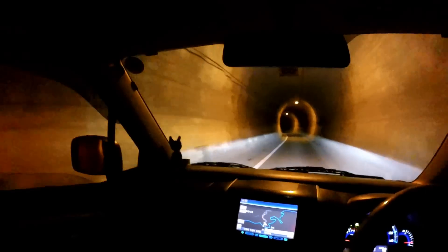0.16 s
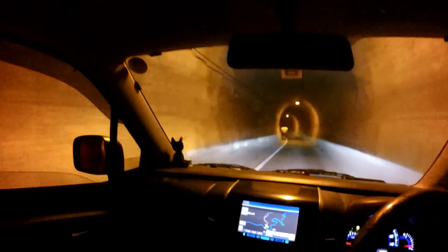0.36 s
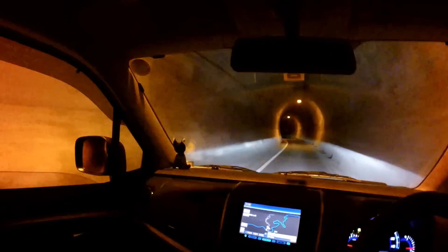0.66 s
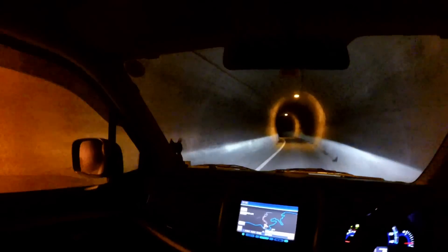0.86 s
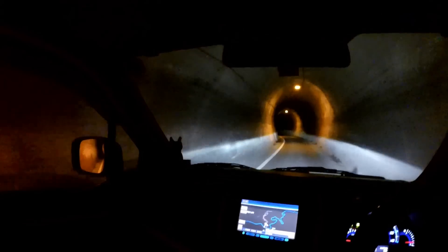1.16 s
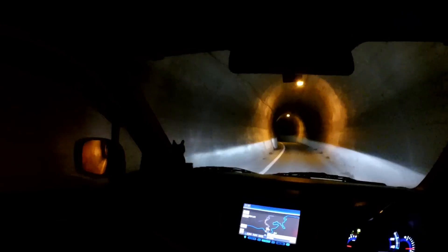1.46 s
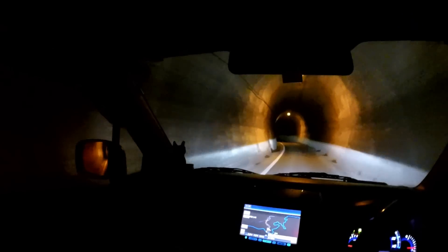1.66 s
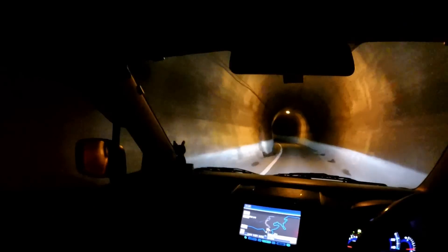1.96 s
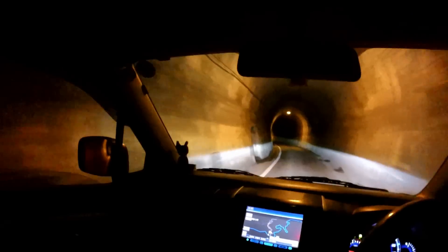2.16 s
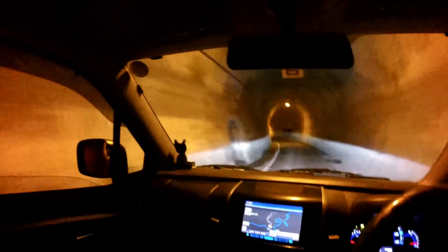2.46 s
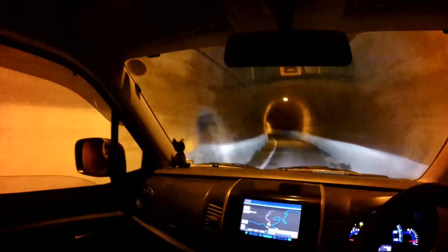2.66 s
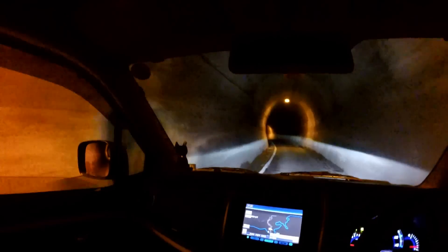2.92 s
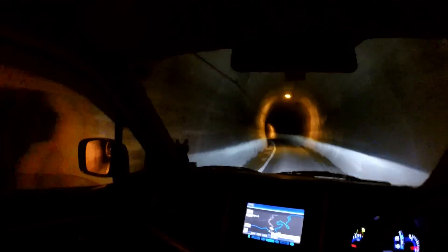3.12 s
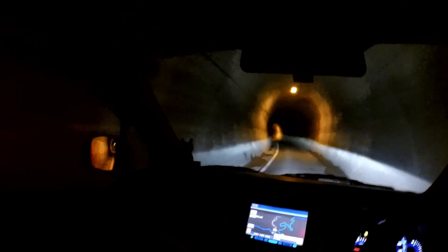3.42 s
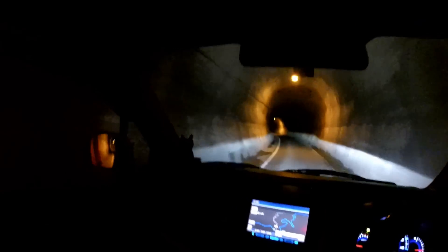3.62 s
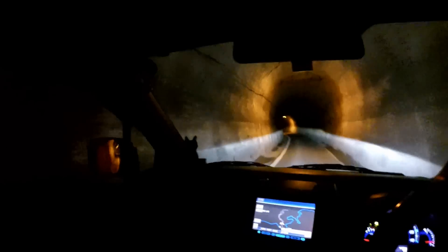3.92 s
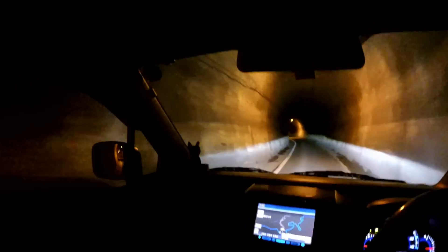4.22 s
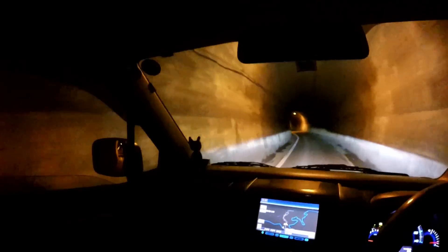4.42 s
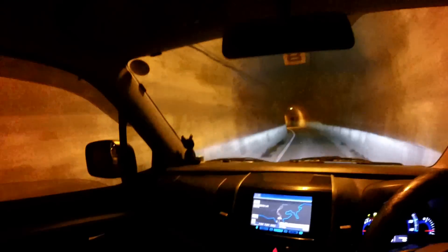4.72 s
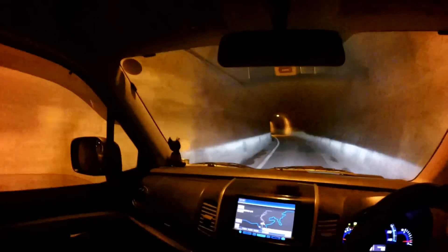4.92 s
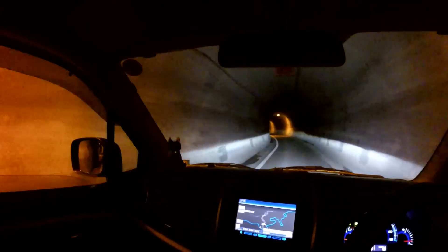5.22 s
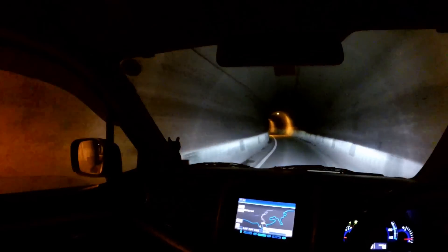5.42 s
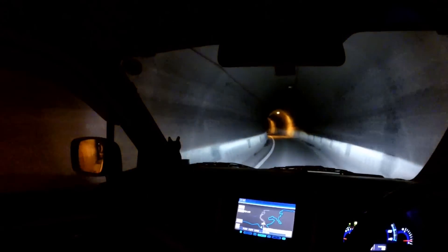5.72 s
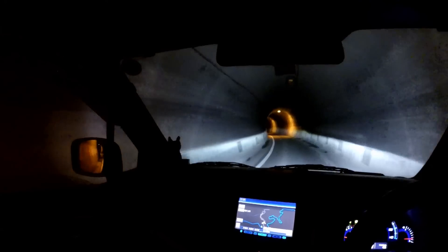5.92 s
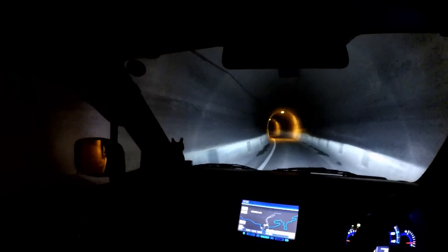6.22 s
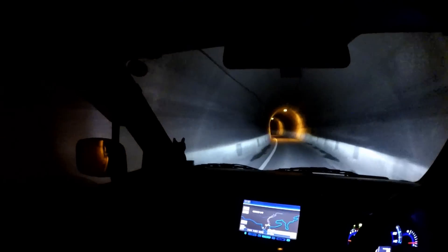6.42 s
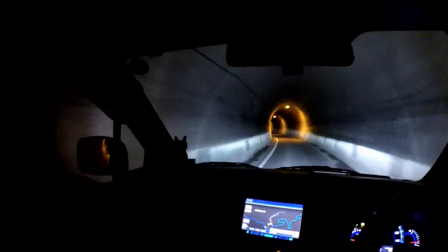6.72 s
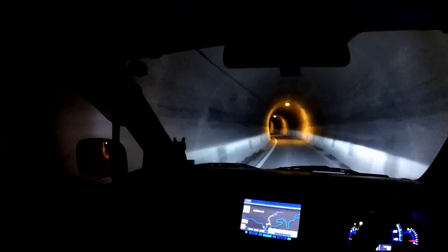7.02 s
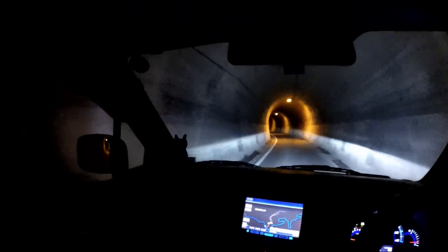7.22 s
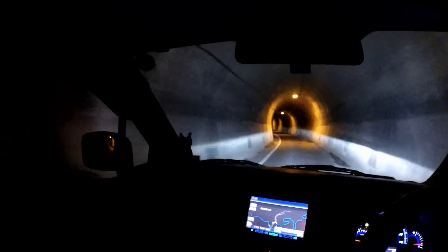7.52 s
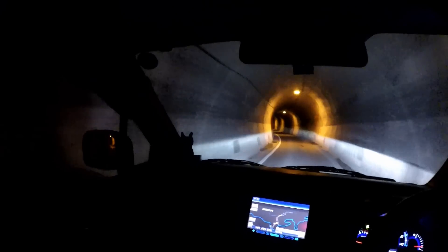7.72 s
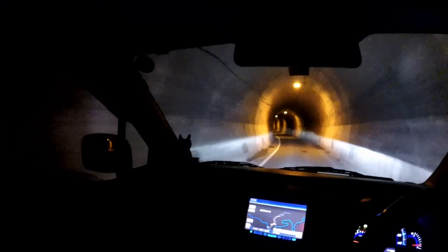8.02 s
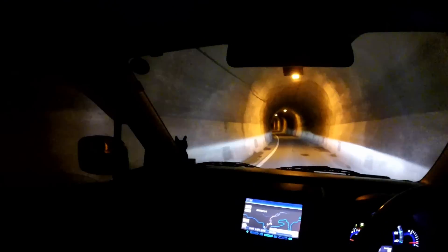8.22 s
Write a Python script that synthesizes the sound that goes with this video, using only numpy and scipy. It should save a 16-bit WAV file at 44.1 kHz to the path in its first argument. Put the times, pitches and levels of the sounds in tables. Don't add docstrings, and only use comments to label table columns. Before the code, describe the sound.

Continuous car interior noise in a road tunnel: heavy low booming with quick irregular swells and soft thuds from ridges and dips, deep engine drone, and much quieter mid-range tyre noise, slightly stronger in the first few seconds. Faint vent air puffs a little around four seconds. The cabin microphone is close and enclosed, bass-heavy, with thin, slightly grainy highs and almost no stereo width.

```python
import sys
import numpy as np
from scipy import signal
from scipy.fft import rfft, irfft, next_fast_len
from scipy.io import wavfile
from scipy.ndimage import uniform_filter1d

SR = 44100
rng = np.random.default_rng(int(sys.argv[2]) if len(sys.argv) > 2 else 0)


def natural_amplitude(level_db):
    exponent = np.asarray(level_db, float) / 20
    return 10 ** exponent


def wav_record(signal):
    frames = np.transpose(np.atleast_2d(signal))
    bounded = np.clip(frames, -1, 1)
    quanta = np.round(bounded * 32767).astype(np.int16)
    wavfile.write(sys.argv[1], SR, quanta)


N = 369116

# [f/Hz, level/dB]
VENT_SPECTRUM = [(2500, -16), (4500, -5), (5300, 2.5), (7800, -1.5), (9000, -6.5), (11500, -11),
                 (20000, -30.5)]
# [f/Hz, width/Hz, level/dB against the vent air]
VENT_WHISTLES = [(6380, 21, -15), (7820, 22, -11)]
# [t/s, lift/dB]
VENT_PUFFS = [
    (3.65, 7.5),
    (4.05, 9.5),
    (4.25, 7.5),
]
VENT_DB, PUFF_S = -62.5, 0.088

# [t/s, level/dB]
WALL_ECHO = [(0, -28.5), (.5, -25), (1.1, -23), (1.35, -26.5), (1.62, -23), (1.95, -26), (2.45, -25.5),
             (2.9, -28), (3.1, -25), (3.42, -29), (4.05, -30.5), (4.55, -28), (4.95, -29.5), (5.2, -27.5),
             (5.45, -29), (6.28, -26.5), (6.5, -28.5), (7.9, -26.5)]
# [f/Hz, level/dB per Hz]
HISS_SPECTRUM = [(900, -19.5), (1550, -1.5), (2250, -2), (2930, -11), (3440, -7), (4600, -15.5),
                 (5260, -14), (6500, -19), (9000, -33), (20000, -59.5)]
# [f/Hz, level/dB per Hz]
ROAR_SPECTRUM = [(250, -29.5), (340, -4), (413, -5), (605, -3), (750, -6), (900, -6), (1200, -25),
                 (2000, -58.5)]
# [f/Hz, level/dB per Hz]
TREAD_SPECTRUM = [(500, -46.5), (800, -8.5), (960, 0), (1100, 0.5), (1270, -4), (1400, -11.5), (1510, -19),
                  (2080, -52), (3500, -110)]
# [f/Hz, width/Hz, level/dB]
GROOVE_TONES = [(995, 30, 1), (1090, 40, -0.5), (1217, 50, -5)]
# [f/Hz, width/Hz, level/dB]
TYRE_AIR_TONES = [(186.4, 27, -2.5), (207.8, 28, -6.5), (229.2, 18, -8.5), (257.5, 14, 1.5),
                  (283, 22, -3.5), (303, 14, -3.5), (322, 14, -3.5)]
HISS_DB, ROAR_DB, TREAD_DB, CAVITY_DB = -46.5, -31, -31, -28.5
HISS_FOLLOWS, ROAR_FOLLOWS, TREAD_FOLLOWS, CAVITY_FOLLOWS = .7, 0.97, 1.44, .8

# [t/s, firing rate f/Hz, hum level/dB]
ENGINE_RUN = [(0, 41.57, -20), (.7, 44.34, -24.5), (1.1, 38.1, -31.5), (1.3, 32.56, -24.5),
              (2.1, 33.34, -27), (2.4, 33, -29), (3.7, 33, -24), (4.15, 31.12, -19), (4.4, 36.47, -23.5),
              (4.8, 39.32, -25.5), (5.2, 40.58, -17.5), (6.2, 39.97, -20), (6.5, 39.4, -24), (6.9, 40, -18),
              (7.3, 40.55, -22), (8.37, 40.56, -19.5)]
# [multiple of the firing rate, level/dB]
ENGINE_TONES = [(1, -5), (1.5, -12), (2, -18.5)]

# [t/s, level/dB]
ROAD_COARSENESS = [(0, -19), (.3, -16), (1.2, -14.5), (1.55, -16.5), (2.1, -12.5), (2.45, -16),
                   (3.2, -14.5), (3.65, -20.5), (3.9, -15.5), (4.22, -25.5), (4.45, -16), (6.3, -14.5),
                   (6.6, -16.5), (7.3, -14), (7.9, -19), (8.37, -16)]
# [t/s, lift/dB]
ROAD_RIDGES = [(.49, 0), (1.2, 2.5), (1.45, 2), (1.98, 3), (1.86, 5), (2.17, -0.5), (2.68, 4), (2.86, 2.5),
               (3.15, 3), (3.28, 6), (3.52, 10), (3.76, 4), (4.48, 5), (4.7, 7.5), (5.02, 1.5), (5.15, 5.5),
               (5.31, 2.5), (5.62, 2), (5.85, 2), (6.08, 1.5), (6.27, 3.5), (6.4, 5.5), (7.13, 4),
               (7.3, 1.5), (7.55, 2), (7.76, 6), (8.02, 6), (8.26, 3.5)]
# [t/s, lift/dB]
ROAD_DIPS = [(.1, 5), (.8, 12.5), (1.07, 13.5), (1.3, 8), (1.7, 13), (1.97, 7.5), (2.45, 15), (3.2, 6),
             (3.64, 10), (4.06, 14), (4.33, 7), (4.78, 5.5), (5.2, 9.5), (5.45, 5), (6.12, 15.5),
             (6.88, 7.5), (7.7, 9), (8.14, -0.5)]
RIDGE_S, DIP_S = 0.04, 0.094
# [f/Hz, width/Hz, level/dB]
ROOF_TONES = [(133, 11, -8.5), (153.3, 7.8, -1)]
# [f/Hz, width/Hz, level/dB]
BODY_TONES = [(17, 32, -12.5), (27.4, 3.8, -7), (33, 3.3, 3), (45.3, 6.6, -8)]
# [f/Hz, width/Hz, level/dB]
CABIN_TONES = [(69.5, 22, -13.5), (89.7, 13, -1), (100.6, 11, 2), (118.7, 11, -0.5)]
ROOF_DB, ROOF_FOLLOWS, BODY_DB, BOOM_DB = -26.5, .8, -31.5, -1

# [f/Hz, lean to the right level/dB, unrelated part level/dB]
MICROPHONE_LEAN = [(100, -55.5, -49.5), (250, -38, -35), (400, -27, -30), (700, -26.5, -27),
                   (1000, -21, -32.5), (2000, -22.5, -30.5), (4000, -22, -26.5), (8000, -26, -27)]

FRAME, FRAME_CENTRE = 941, 615
REACH_HZ, STARVED_HZ, GENEROUS_HZ = 6480, 4960, 8400
STARVED_SHARE, GENEROUS_SHARE = .06, .07
LOSS_PER_DB, GAIN_PER_DB = 0.04, 0.02
PAYBACK = .3
# [start t/s, length t/s, top f/Hz]
CAMERA_SPELLS = [(.28, .025, 8400), (.815, .03, 10700), (1.09, .045, 9650), (1.84, .065, 5310),
                 (2.61, .085, 3850), (2.755, .045, 10000), (3.27, .065, 4500), (3.48, .045, 3830),
                 (3.59, .125, 8400), (3.72, .04, 4000), (3.89, .04, 8610), (4.015, .065, 10860),
                 (4.16, .13, 9250), (4.44, .045, 4350), (4.72, .02, 10700), (4.89, .065, 4000),
                 (5.0, .04, 4070), (5.445, .02, 8330), (5.465, .045, 4430), (5.765, .045, 4500),
                 (6.02, .065, 8400), (6.425, .11, 3860), (6.575, .02, 9300), (6.79, .045, 4295),
                 (7.535, .065, 4600), (7.64, .065, 8710), (7.96, .025, 11500), (8.24, .04, 4400),
                 (8.28, .12, 10030)]


def rms_one(x):
    return x / np.sqrt(np.mean(x ** 2) + 1e-20)


def in_time(rows):
    s, *columns = np.transpose(rows)
    return [np.interp(np.arange(N) / SR, s, c) for c in columns]


def humps(rows, width_s):
    s, lift_db = np.transpose(rows)
    coarse = np.arange(0, N + 64, 64)
    bells = np.exp(-.5 * ((coarse / SR - s[:, None]) / width_s) ** 2)
    return np.interp(np.arange(N), coarse, lift_db @ bells)


def drift(rate):
    r = np.exp(-80 * np.pi * rate / SR)
    noise = rng.standard_normal(N // 40 + 2002)
    slow = signal.lfilter([1], [1, -2 * r, r * r], noise)[2000:]
    return np.interp(np.arange(N) / 40, np.arange(len(slow)), rms_one(slow))


def coloured(x, points, column=1):
    size = next_fast_len(N)
    hz = np.maximum(np.arange(size // 2 + 1) * SR / size, 1)
    table = np.array(points, float)
    curve_db = np.interp(np.log(hz), np.log(table[:, 0]), table[:, column])
    return irfft(rfft(x, size) * natural_amplitude(curve_db), size)[:N]


def low_pass(x, order, hz):
    return signal.sosfilt(signal.butter(order, hz, fs=SR, output="sos"), x)


def resonant(modes, even, even_s, cut_hz):
    out = np.zeros(N)
    for hz, width, level_db in modes:
        r, w = np.exp(-np.pi * width / SR), 2 * np.pi * hz / SR
        shaking = rng.standard_normal(N + SR)
        swing = signal.lfilter([1, 0, -1], [1, -2 * r * np.cos(w), r * r], shaking)[SR:]
        out += natural_amplitude(level_db) * np.sqrt(width) * rms_one(swing)
    out = rms_one(out)
    span = int(even_s * SR)
    swell = uniform_filter1d(uniform_filter1d(out ** 2, span), span)
    out = out / (swell + 0.035) ** (even / 2)
    return rms_one(low_pass(out, 6, cut_hz))


def patchy(spectrum, edges_hz, patchy_db, rate):
    rest = coloured(rng.standard_normal(N), spectrum)
    together = drift(1.5)
    out = 0
    for hz in edges_hz:
        low = low_pass(rest, 2, hz)
        out = out + low * natural_amplitude(patchy_db * (0.55 * together + drift(rate)))
        rest = rest - low
    return rms_one(out + rest)


def vents():
    air = rms_one(coloured(rng.standard_normal(N), VENT_SPECTRUM))
    for whistle in VENT_WHISTLES:
        air = air + natural_amplitude(whistle[2]) * resonant([whistle], even=0.18, even_s=0.054, cut_hz=15000)
    return natural_amplitude(VENT_DB + humps(VENT_PUFFS, PUFF_S)) * air


def air_hiss(hiss_db):
    return natural_amplitude(hiss_db + 1.55) * patchy(HISS_SPECTRUM, [2300, 3380, 4500, 6750], patchy_db=0.11, rate=8.0)


def tyre_roar(roar_db):
    return natural_amplitude(roar_db) * patchy(ROAR_SPECTRUM, [500, 750], patchy_db=.5, rate=40.0)


def tyre_tread(tread_db):
    slap = natural_amplitude(tread_db) * patchy(TREAD_SPECTRUM, [1000, 1250], patchy_db=0.6, rate=30.0)
    return slap + natural_amplitude(tread_db - 5) * resonant(GROOVE_TONES, even=0.1, even_s=0.054, cut_hz=1400)


def tyre_cavity(walls_db, bumps_db):
    level_db = CAVITY_DB + CAVITY_FOLLOWS * walls_db + 0.11 * bumps_db + 0.83 * drift(14.0)
    return natural_amplitude(level_db) * resonant(TYRE_AIR_TONES, even=0.25, even_s=0.22, cut_hz=364)


def engine():
    hz, hum_db = in_time(ENGINE_RUN)
    turn = 2 * np.pi * np.cumsum(hz * (1 + .006 * drift(1.8))) / SR
    tones = np.zeros(N)
    for multiple, level_db in ENGINE_TONES:
        tones += natural_amplitude(level_db) * np.sin(multiple * turn + rng.uniform(0, 9.35))
    return np.sqrt(2) * natural_amplitude(hum_db + 2.5 + 0.87 * drift(5.3)) * tones


def roof_panel(bumps_db):
    level_db = ROOF_DB + ROOF_FOLLOWS * bumps_db + 0.87 * drift(8.2)
    return natural_amplitude(level_db) * resonant(ROOF_TONES, even=0.97, even_s=0.15, cut_hz=164)


def body_shake():
    level_db = BODY_DB + humps(ROAD_DIPS, DIP_S) + 1.1 * drift(3.2)
    return natural_amplitude(level_db) * resonant(BODY_TONES, even=0.37, even_s=0.15, cut_hz=51)


def cabin_boom(road_db):
    level_db = BOOM_DB + road_db + 1.0 * drift(7.2)
    return natural_amplitude(level_db) * resonant(CABIN_TONES, even=0.52, even_s=0.064, cut_hz=141)


def scene():
    road_db = in_time(ROAD_COARSENESS)[0] + humps(ROAD_RIDGES, RIDGE_S)
    bumps_db = road_db - road_db.mean()
    walls_db = in_time(WALL_ECHO)[0]
    walls_db = walls_db - walls_db.mean() + .4 * drift(7.0)
    hiss_db = HISS_DB + HISS_FOLLOWS * walls_db
    roar_db = ROAR_DB + ROAR_FOLLOWS * walls_db
    tread_db = TREAD_DB + TREAD_FOLLOWS * walls_db

    vent = vents()
    cavity = tyre_cavity(walls_db, bumps_db)
    mid = vent + air_hiss(hiss_db) + tyre_roar(roar_db) + tyre_tread(tread_db) + cavity
    mid = mid + engine() + roof_panel(bumps_db) + body_shake() + cabin_boom(road_db)

    apart = vent[::-1] + cavity[::-1]
    apart = apart + natural_amplitude(hiss_db) * patchy(HISS_SPECTRUM, [3200], patchy_db=2.5, rate=8.0)
    apart = apart + natural_amplitude(roar_db) * rms_one(coloured(rng.standard_normal(N), ROAR_SPECTRUM))
    apart = apart + natural_amplitude(tread_db) * rms_one(coloured(rng.standard_normal(N), TREAD_SPECTRUM))
    side = coloured(apart, MICROPHONE_LEAN, column=2) - coloured(mid, MICROPHONE_LEAN)
    return np.array([mid + side, mid - side])


def camera_reach(lines, centre_s, jitter):
    count = len(centre_s)
    bass_db = uniform_filter1d(10 * np.log10(np.sum(lines[:, :8] ** 2, axis=1) + 1e-3), size=3)
    hiss_db = uniform_filter1d(10 * np.log10(np.sum(lines[:, 64:128] ** 2, axis=1) + 1e-9), size=15)
    lift = np.exp(GAIN_PER_DB * (hiss_db - np.median(hiss_db)))
    bass_loss = LOSS_PER_DB * (bass_db - np.median(bass_db))
    reach = REACH_HZ * np.exp(jitter * rng.standard_normal(count) - bass_loss)
    luck = rng.random(count // 2 + 1).repeat(2)[:count]
    spread = np.exp(jitter * rng.standard_normal(count) / 2)
    reach = lift * np.where(luck < STARVED_SHARE / lift ** 8, STARVED_HZ * spread, reach)
    reach = np.where(rng.random(count) < GENEROUS_SHARE, GENEROUS_HZ * spread, reach)
    reach = reach * (np.roll(reach, 2) / REACH_HZ) ** -PAYBACK
    for start, length, hz in CAMERA_SPELLS:
        reach[(centre_s >= start) & (centre_s < start + length)] = hz
    return reach


def camera_rounding(x, reach_db, jitter, band_db, side_db, mono_hz, mono_octaves):
    count = N // FRAME + 3
    n, k = np.arange(2 * FRAME), np.arange(FRAME)

    window = signal.windows.kaiser_bessel_derived(2 * FRAME, 4 * np.pi)
    waves = np.cos(np.pi / FRAME * np.outer(k + .5, n + (FRAME + 1) / 2))
    basis = window * waves * np.sqrt(2 / FRAME)
    lead = 2 * FRAME - FRAME_CENTRE
    pair = np.zeros((2, (count + 1) * FRAME))
    pair[:, lead:lead + N] = [x[0] + x[1], x[0] - x[1]]
    blocks = pair.reshape(2, -1, FRAME)
    lines = np.concatenate([blocks[:, :-1], blocks[:, 1:]], axis=2) @ basis.T

    centre = np.clip((np.arange(count) + 1) * FRAME - lead, 0, N - 1)
    reach = camera_reach(lines[0], centre / SR, jitter)
    top = np.clip(reach / SR * 2 * FRAME, 0, FRAME - 1).astype(int)
    usual = np.sqrt(uniform_filter1d(uniform_filter1d(lines[0] ** 2, size=41, axis=1), size=15, axis=0))
    bands = rng.standard_normal((2, count, FRAME // 16 + 1)).repeat(16, axis=2)[..., :FRAME]
    step = usual[np.arange(count), top, None] * natural_amplitude(reach_db + band_db * bands)
    step[1] *= natural_amplitude(side_db)

    lines = np.sign(lines) * step * np.floor(np.abs(lines) / step + .4054)
    lines[:, k > top[:, None] * 1.04] = 0
    jumps = rng.standard_normal(count // 2 + 1).repeat(2)[:count]
    mono = mono_hz * 2 ** (mono_octaves * jumps)
    lines[1, k * SR / (2 * FRAME) < mono[:, None]] = 0

    halves = (lines @ basis).reshape(2, count, 2, FRAME)
    joined = (halves[:, :-1, 1] + halves[:, 1:, 0]).reshape(2, -1)
    total, apart = joined[:, lead - FRAME:lead - FRAME + N]
    return np.array([total + apart, total - apart]) / 2


def top_cut(x):
    return signal.sosfilt(signal.butter(12, 12500, fs=SR, output="sos"), x)


def record(dry):
    rounded = 1.658 * np.tanh(dry / 1.586)
    mix = camera_rounding(rounded, reach_db=10.5, jitter=.09, band_db=3.0, side_db=-20.5,
                          mono_hz=370, mono_octaves=.55)
    return top_cut(mix)


dry = scene()
out = record(dry)
wav_record(out)
```